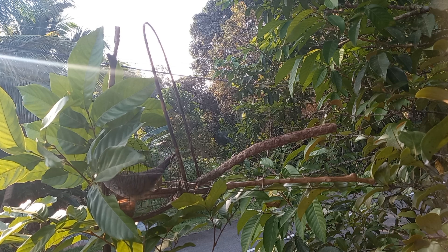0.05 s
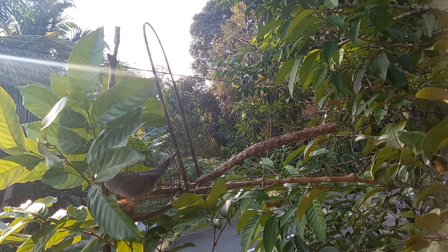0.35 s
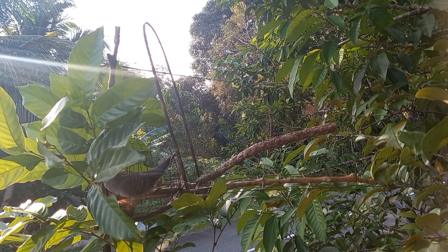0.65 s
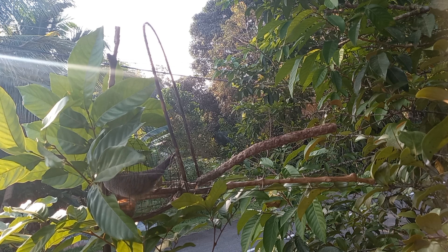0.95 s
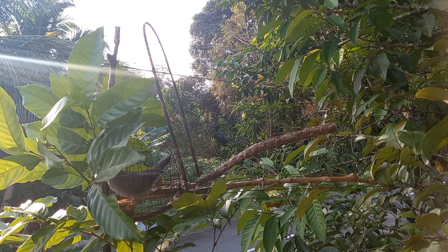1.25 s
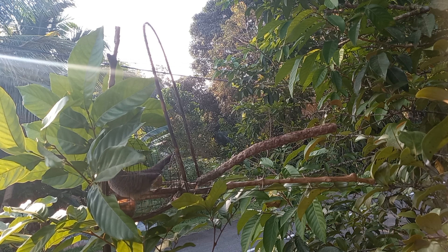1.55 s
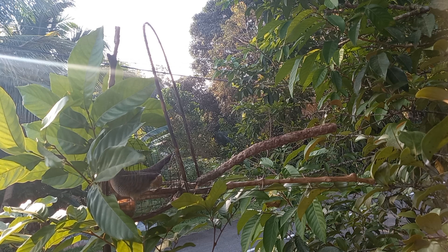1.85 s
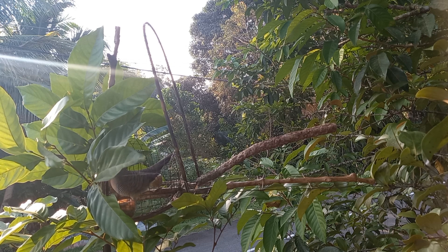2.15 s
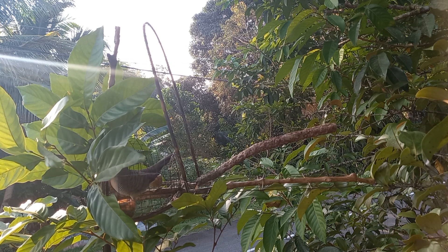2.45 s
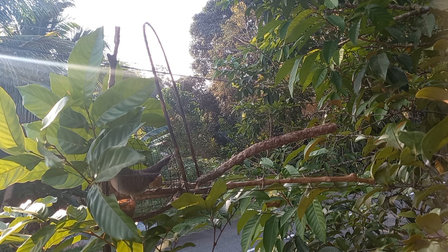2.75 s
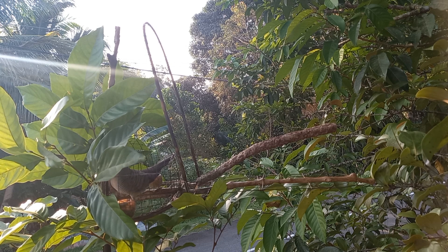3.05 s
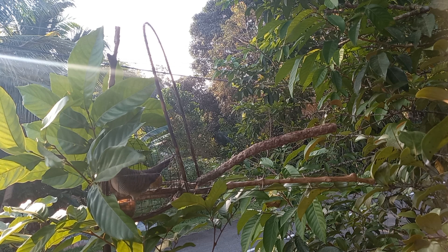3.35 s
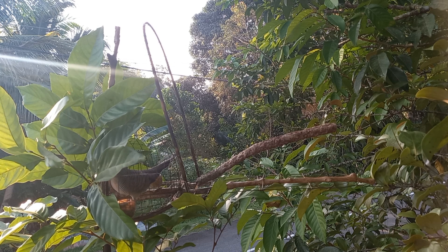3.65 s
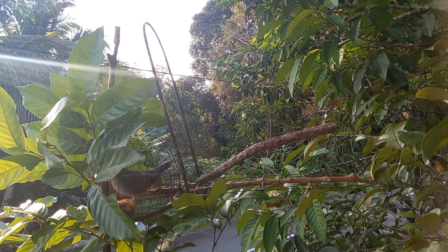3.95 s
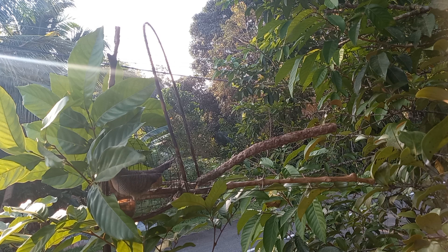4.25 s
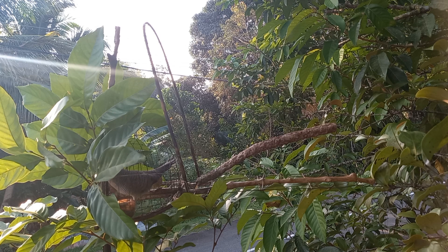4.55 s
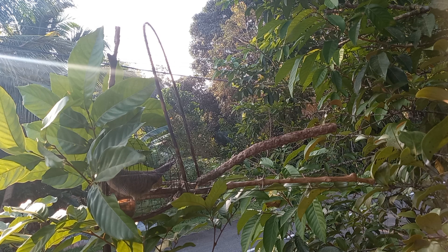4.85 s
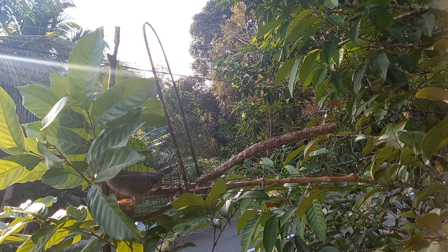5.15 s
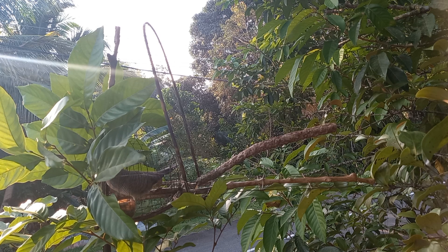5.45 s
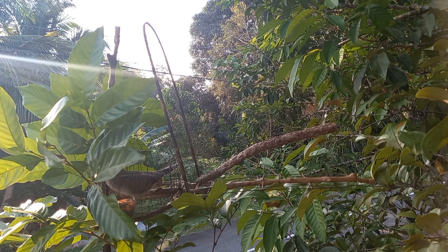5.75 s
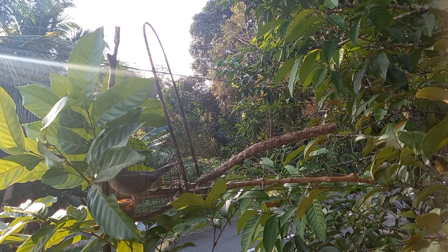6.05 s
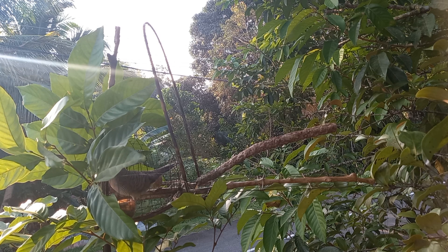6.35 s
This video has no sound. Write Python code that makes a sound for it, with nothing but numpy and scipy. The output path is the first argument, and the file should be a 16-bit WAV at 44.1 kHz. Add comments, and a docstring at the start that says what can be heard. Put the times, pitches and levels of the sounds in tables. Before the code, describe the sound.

Swelling, throaty dove coos trail off into short stuttering notes, with a distant reply, small birds and a soft, high garden hiss.

```python
"""A dove on a garden branch, close to a stereo pair of microphones, gives two swelling, purring coos
that break up into staccato notes; a second dove answers from further off. Every sound of theirs is a
short tone puff near 1 kHz that rings the inflated crop; a coo is a fast train of such puffs.
Small birds call in the trees over a high insect-like hiss and a low distant rumble, both of which come
up a little with each coo and chirp."""
import sys
import numpy as np
from scipy import signal
from scipy.fft import rfft, irfft
from scipy.io import wavfile
from scipy.ndimage import uniform_filter1d, minimum_filter1d

SR = 44100
rng = np.random.default_rng(int(sys.argv[2]) if len(sys.argv) > 2 else 0)


def pcm_store(signal):
    """Save signal as 16-bit PCM."""
    levels = np.round(np.clip(np.atleast_2d(signal), -1, 1) * 32767)
    wavfile.write(sys.argv[1], SR, levels.astype(np.int16).T)


N = 290619

# coos of the near, far and near dove: start/s, end/s, first and last puff rate/Hz, swell time/s,
# swell depth/dB, relative peak level/dB, top f/Hz, background lift/dB, f/Hz of the notes that follow
COOS = [(0.004, 0.3711, 133.8, 73.8, 0.2, 18.2, -2, 1141, 6.1, 1074),
        (2.491, 3.003, 149, 100, 0.224, 24.8, -20, 1085, 3.2, 972),
        (4.59, 5.056, 134.7, 77.65, 0.1887, 22, 0.2, 1149, 5.7, 1057)]
# hoarse chirps of small birds: t/s, length/s, start f/Hz, end f/Hz, relative level/dB
CHIRPS = [(0.938, 0.06, 2695, 3160, -45), (2.511, 0.034, 3740, 3360, -48.5),
          (2.57, 0.033, 5020, 4420, -45.5), (2.904, .032, 3780, 3810, -43.5),
          (2.952, .1, 2727, 3224, -42.5), (3.598, 0.12, 2625, 3210, -52), (4.028, 0.16, 2693, 3190, -52),
          (4.391, 0.11, 2974, 2634, -43), (4.527, 0.18, 3220, 3260, -49.5), (4.978, .09, 2730, 3000, -38.5),
          (5.35, 0.081, 3053, 2583, -43), (5.433, 0.075, 2400, 3230, -42.5)]


def near_dove():
    """Two coos and their trailing notes, close and almost on axis; one nearby surface echoes them."""
    # staccato notes: t/s, relative level/dB
    notes = [(0.4092, -7), (0.4837, -7.5), (0.5675, -7.8), (0.6609, -7.5), (0.7501, -8), (0.8389, -8.5),
             (0.9382, -10.5), (1.018, -10), (1.1195, -16), (5.1099, -3.5), (5.2012, -6.5), (5.287, -23),
             (5.3006, -8), (5.3801, -7), (5.471, -8), (5.556, -8), (5.6474, -9.9), (5.7152, -10.9)]
    # dry throat clicks as the voice catches or gives out: t/s, relative level/dB, f/Hz
    clicks = [(0.3963, -17, 1100), (1.1403, -20, 1120), (1.1645, -16, 992), (4.551, -36, 1100),
              (4.5714, -16.5, 1193), (5.8145, -20, 960), (5.8252, -18, 950), (5.839, -18, 1050)]
    click_half_s, echo_s = .00077, .016
    first = coo(COOS[0], soft_s=.00055, full_s=.0014, scatter_db=.6, limp_db=4, slip_cycles=.28)
    second = coo(COOS[2], soft_s=.00048, full_s=.0014, scatter_db=1.2, limp_db=6.5, slip_cycles=.19)
    singles = staccato(notes) + [(s, db, hz, click_half_s, 0) for s, db, hz in clicks]
    voice = dove_voice(first, crop_hz=1023, ring=.9, edge_db=-26, rasp_db=-17)
    voice += dove_voice(second, crop_hz=1022, ring=1, edge_db=-25.5, rasp_db=-19)
    voice += dove_voice(singles, crop_hz=995, ring=1.3, edge_db=-24, rasp_db=-31)
    scatter = garden(voice, first_s=.013, t60_s=.13, late_db=-11)
    echo = undb(-24) * np.interp(clock() - echo_s, clock(), voice, left=0)
    return place(voice + echo, lead_s=.00008, pan_db=-.2) + undb(-20) * scatter


def coo(row, soft_s, full_s, scatter_db, limp_db, slip_cycles, gain_db=0):
    """A running tone chopped into puffs, which lengthen and grow more even as the dove pushes harder."""
    start_s, end_s, first_rate, last_rate, swell_s, depth_db, peak_db, top_hz = row[:8]
    sag_db_per_s, sag_hz_per_s, push_hz_per_db, falter_s = 9.5, 290, 5, .032
    u = np.linspace(0, 1, int((end_s - start_s) * SR))
    rate = first_rate + (last_rate - first_rate) * u ** 1.7  # slows ever faster as the breath runs out
    rate *= 1 + .02 * walk(25)[:len(u)]
    cycles = np.cumsum(rate) / SR
    age = (end_s - start_s) * np.interp(np.arange(cycles[-1] % 1, cycles[-1] + .5), cycles, u)
    late, loud, slip = rng.standard_normal((len(age), 3)).T
    push_db = -depth_db * np.maximum(1 - age / swell_s, 0) ** 1.4  # eases into the peak
    spent_s = np.maximum(age - swell_s, 0)
    effort_db = push_db - sag_db_per_s * spent_s
    effort = undb(effort_db)
    # at low pressure strong and weak puffs alternate; the last ones limp again
    falter = .55 * np.exp((age - age[-1]) / falter_s)
    limp = limp_db * (1 - undb(push_db) + falter) * (-1) ** np.arange(len(age))[::-1]
    level_db = peak_db + effort_db + gain_db + limp + scatter_db * (1 - effort / 2) * loud
    tone_hz = top_hz + push_hz_per_db * push_db - sag_hz_per_s * spent_s
    # every period has its own length, which makes the purr throaty
    times = start_s + age + .0002 * np.cumsum(late - late.mean())
    # the tone runs on between the puffs, but slips a little each time
    turns = np.cumsum(tone_hz * np.diff(times, prepend=start_s) + slip_cycles * slip / np.sqrt(effort))
    half_s = soft_s + (full_s - soft_s) * np.sqrt(effort)
    return np.column_stack([times, level_db, tone_hz, half_s, turns])


def staccato(notes):
    """Single full puffs whose tone sinks with the time since the last coo."""
    sag_hz_per_s, half_s = 88, .0015
    puffs = []
    for s, db in notes:
        since_s, hz = min((s - end_s, note_hz) for start_s, end_s, *_, note_hz in COOS if start_s < s)
        puffs.append((s, db, hz - sag_hz_per_s * since_s, half_s, 0))
    return puffs


def dove_voice(puffs, crop_hz, ring, edge_db, rasp_db):
    """Each puff is a few cycles of tone; the crop rings on, and the abrupt opening adds a faint edge."""
    tone, edge, airflow = np.zeros((3, N))
    for s, db, hz, half_s, turns in puffs:
        start_s = np.floor((s - .008) * SR) / SR
        t = start_s - s + np.arange(SR // 60) / SR
        envelope = undb(db) * np.exp(-.5 * (t / half_s) ** 2)
        add(tone, start_s, envelope * np.cos(2 * np.pi * (hz * t + turns)))
        # the opening snap and its rasp grow more slowly than the tone, so weak puffs sound drier
        add(edge, start_s, undb(.35 * db) * np.exp(-.5 * ((t + half_s) / .0001) ** 2))
        add(airflow, start_s, undb(.083 * db) * np.exp(-.5 * (t / half_s / 2 - .5) ** 2))
    body = (tone + ring * resonance(tone, crop_hz, width_hz=95)) / (1 + .35 * ring)
    upper = undb(edge_db) * edge + undb(rasp_db) * airflow * rng.standard_normal(N)
    upper = .42 * upper + resonance(upper, 1400, 420) + .21 * resonance(upper, 1930, 150)
    # the closed beak lets little out above 2 kHz
    throat = signal.butter(5, [570, 2120], "bandpass", fs=SR, output="sos")
    return body + signal.sosfiltfilt(throat, upper)


def far_dove():
    """The answer comes from further away and off axis, with more of the garden in it."""
    # staccato notes: t/s, relative level/dB
    notes = [(3.023, -23), (3.046, -34), (3.067, -22.5), (3.121, -26.5), (3.214, -29.5), (3.265, -28.5),
             (3.327, -30), (3.394, -30), (3.46, -31), (3.534, -34.5), (3.585, -37), (3.744, -44.5)]
    purr = coo(COOS[1], soft_s=.0011, full_s=.0012, scatter_db=1, limp_db=7, slip_cycles=.26, gain_db=-.5)
    puffs = np.vstack([purr, staccato(notes)])
    voice = dove_voice(puffs, crop_hz=980, ring=1, edge_db=-36.5, rasp_db=-35.5)
    scatter = garden(voice, first_s=.00467, t60_s=.31, late_db=-22)
    return undb(-.5) * place(voice, lead_s=-.00025, pan_db=3.4) + undb(-4) * scatter


def small_birds():
    """Chirps and whistles from the left, reaching the microphones mostly by way of the trees."""
    # thin far-off whistles: t/s, length/s, start f/Hz, end f/Hz, relative level/dB
    whistles = [(1.296, 0.48, 733, 796, -63), (2.17, .12, 1700, 1642, -58),
                (2.402, 0.38, 1670, 1713, -52.5), (2.538, .07, 2650, 2504, -46),
                (2.621, .15, 2536, 2710, -49.5), (2.627, 0.14, 1870, 2015, -52),
                (3.191, 0.136, 1644, 1590, -57.5), (3.371, 0.162, 1650, 1533, -54),
                (5.878, 0.17, 760, 617, -59), (6.298, 0.18, 2544, 2805, -60)]
    hoarse_hz, thin_hz = 259.7, 27.5  # spread of the pitch
    calls = np.zeros(N)
    for table, waver_hz in ((CHIRPS, hoarse_hz), (whistles, thin_hz)):
        for s, length_s, start_hz, end_hz, db in table:
            add(calls, s, undb(db) * bird_note(length_s, start_hz, end_hz, waver_hz))
    direct = undb(-9) * place(calls, lead_s=.00005, pan_db=6)
    scatter = garden(calls, first_s=.002, t60_s=.18, late_db=-10)
    return direct + undb([[2.5], [-1.5]]) * scatter


def bird_note(length_s, start_hz, end_hz, waver_hz):
    """One gliding tone; a wide, quick waver makes it hoarse."""
    u = np.linspace(0, 1, int(length_s * SR))
    hz = start_hz + (end_hz - start_hz) * u + waver_hz * walk(320)[:len(u)]
    envelope = np.sqrt(np.abs(np.sin(np.pi * u)))
    return unit(envelope * np.sin(2 * np.pi * np.cumsum(hz) / SR))


def high_hiss():
    """A steady high insect-like hiss, strongest near 4.6 kHz and 9-10 kHz, spread across the pair."""
    # hiss spectrum: f/Hz, relative level/dB
    spectrum = [(1200, -22), (2000, -9), (3000, -5.5), (4100, -7), (4550, 0.5), (4900, -3.5), (6400, -7.5),
                (7000, -16), (7550, -48), (8150, -13), (8800, -6), (10300, -5.5), (11300, -14.5)]
    # where the hiss sits: f/Hz, left minus right level/dB
    balance = [(4500, -2.5), (6500, -4), (8500, 0.5)]
    sides = zip(stereo_noise(spectrum, alike_hz=608.5), (1, -1))
    hiss = np.array([colour(x, [(hz, side * db / 2) for hz, db in balance]) for x, side in sides])
    return restless(hiss, depth_db=1.16)


def distant_rumble():
    """Open air with a far-off rumble, strongest near 94 Hz."""
    # air spectrum: f/Hz, relative level/dB
    spectrum = [(25, -31.5), (40, -17.5), (55, -15), (75, -4.5), (94, 1.5), (115, -8), (190, -19.5),
                (260, -17.5), (500, -20.5), (750, -19), (1150, -26), (1800, -17), (3000, -34.5),
                (6000, -47.5)]
    return restless(stereo_noise(spectrum, alike_hz=644), depth_db=.65)


def background():
    """Rumble and high hiss; both swell around each coo and chirp."""
    rise_s, fall_s, lead_s, chirp_lift_db = .22, .21, .12, 1.6
    spans = [(start_s, end_s, lift_db) for start_s, end_s, *_, lift_db, _ in COOS]
    spans += [(s, s + length_s + fall_s / 2, chirp_lift_db) for s, length_s, *_ in CHIRPS]
    t, swell_db = clock(), np.zeros(N)
    for start_s, end_s, lift_db in spans:
        ramp = np.minimum((t - start_s + lead_s) / rise_s, (end_s - t) / fall_s + .5)
        swell_db = np.maximum(swell_db, lift_db * np.clip(ramp, 0, 1))
    return distant_rumble() * undb(-53.5 + .7 * swell_db) + high_hiss() * undb(-48.5 + swell_db)


def restless(x, depth_db):
    """Many small far-off sources come and go: patches of the spectrum rise and fall on their own."""
    frames = signal.stft(x, nperseg=1024)[2]
    patches = uniform_filter1d(rng.standard_normal(frames.shape[1:]), size=7, axis=0)
    patches = unit(uniform_filter1d(patches, size=14, axis=1))
    return signal.istft(frames * undb(depth_db * patches))[1][:, :N]


def garden(x, first_s, t60_s, late_db):
    """Scatter from leaves and walls: a quick dense cluster and a weak longer tail."""
    t = np.arange(SR) / SR
    fade = undb(-60 * t / t60_s) + undb(late_db - 60 * t / (t60_s * 4))
    spectrum = rfft(rng.standard_normal((2, SR)) * fade)
    # leaves scatter all pitches about equally, so the colour is evened out
    spectrum /= np.sqrt(uniform_filter1d(np.abs(spectrum) ** 2, size=400, axis=1))
    echoes = np.pad(irfft(spectrum), ((0, 0), (int(first_s * SR), 0)))
    return signal.fftconvolve(x[None], echoes, axes=1)[:, :N]


def place(x, lead_s, pan_db):
    """A source off axis reaches the left microphone lead_s earlier and pan_db louder."""
    t = clock()
    return np.array([np.interp(t + side * lead_s / 2, t, x) * undb(side * pan_db / 2)
                     for side in (1, -1)])


def stereo_noise(points, alike_hz):
    """Noise coloured by (f/Hz, level/dB) points; the two sides are alike below alike_hz."""
    likeness = .75 / (1 + (np.fft.rfftfreq(N, 1 / SR) / alike_hz) ** 4)
    mid = irfft(rfft(rng.standard_normal(N)) * np.sqrt(1 + likeness), N)
    side = irfft(rfft(rng.standard_normal(N)) * np.sqrt(1 - likeness), N)
    return unit(colour(np.array([mid + side, mid - side]), points))


def colour(x, points):
    """Filter by a curve of (f/Hz, level/dB) points."""
    f = np.maximum(np.fft.rfftfreq(N, 1 / SR), 1)
    hz, db = np.transpose(points)
    return irfft(rfft(x) * undb(np.interp(np.log(f), np.log(hz), db)), N)


def resonance(x, hz, width_hz):
    """Two-pole band-pass, gain 1 at the centre."""
    return signal.lfilter(*signal.iirpeak(hz, hz / width_hz, SR), x)


def walk(rate):
    """Smooth random drift of rms 1 that changes about rate times a second."""
    k = max(int(SR / rate), 1)
    steps = np.repeat(rng.standard_normal(N // k + 1), k)
    return unit(uniform_filter1d(uniform_filter1d(steps, k), k)[:N])


def add(track, start_s, sound):
    """Mix a sound into a track, dropping what falls outside."""
    i = int(round(start_s * SR)) + np.arange(len(sound))
    inside = (i >= 0) & (i < N)
    track[i[inside]] += sound[inside]


def undb(db):
    """Decibels to gain."""
    return 10 ** (np.asarray(db) / 20)


def unit(x):
    """Scale to rms 1."""
    return x / np.sqrt(np.mean(x ** 2))


def clock():
    """Time of every sample, s."""
    return np.arange(N) / SR


def scene():
    """Both doves, the small birds and the garden around the microphones."""
    return near_dove() + far_dove() + small_birds() + background()


def record(dry):
    """A limiter eases the loudest puffs under full scale; the top is cut at 11.6 kHz."""
    headroom = np.minimum(1, .95 / (np.abs(dry).max(axis=0) + 1e-9))
    gain = minimum_filter1d(headroom, size=600)
    gain = uniform_filter1d(uniform_filter1d(gain, size=300), size=300)
    return signal.sosfilt(signal.ellip(8, .2, 70, 11600, fs=SR, output="sos"), dry * gain)


dry = scene()
out = record(dry)
pcm_store(out)
```